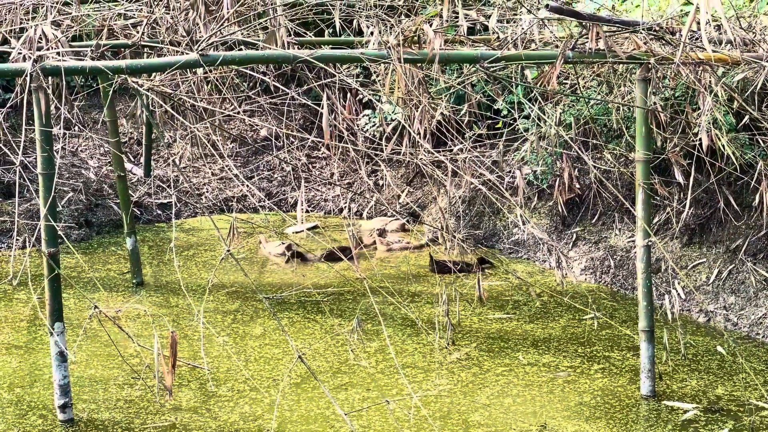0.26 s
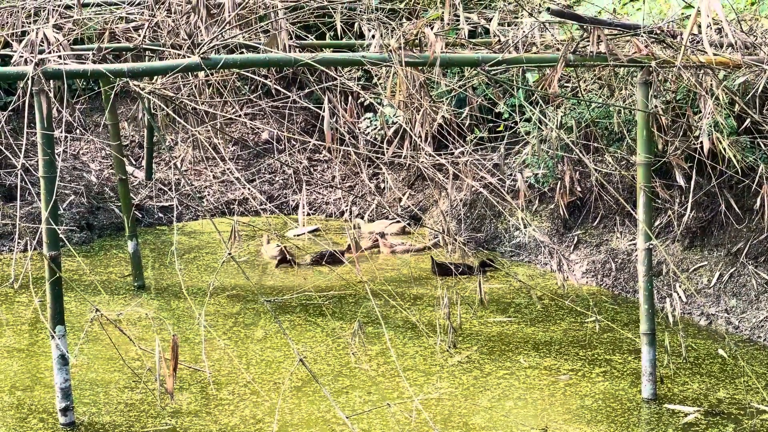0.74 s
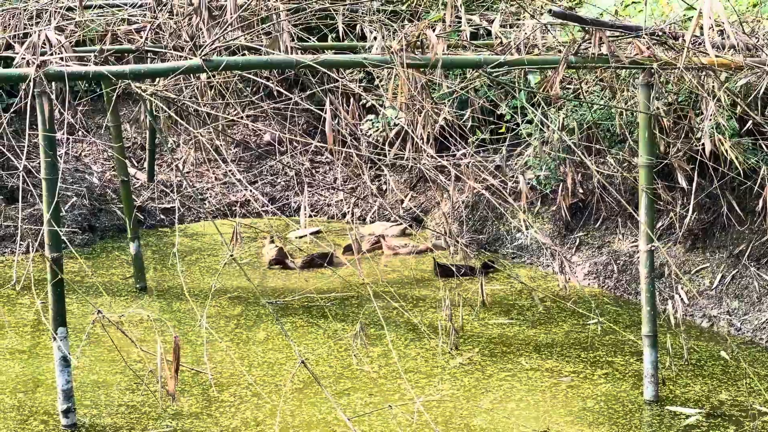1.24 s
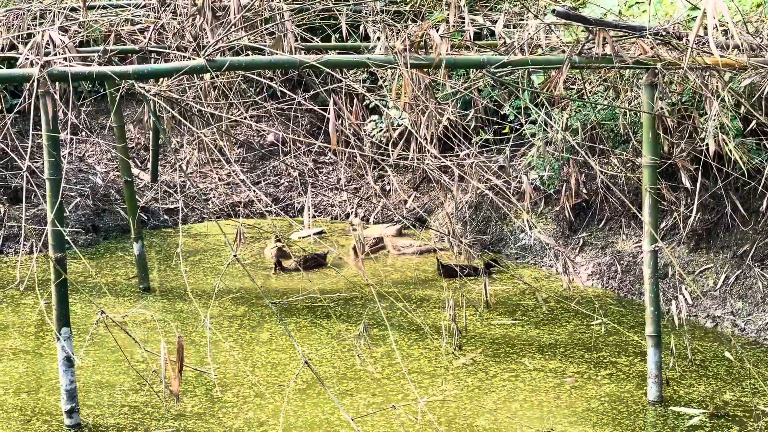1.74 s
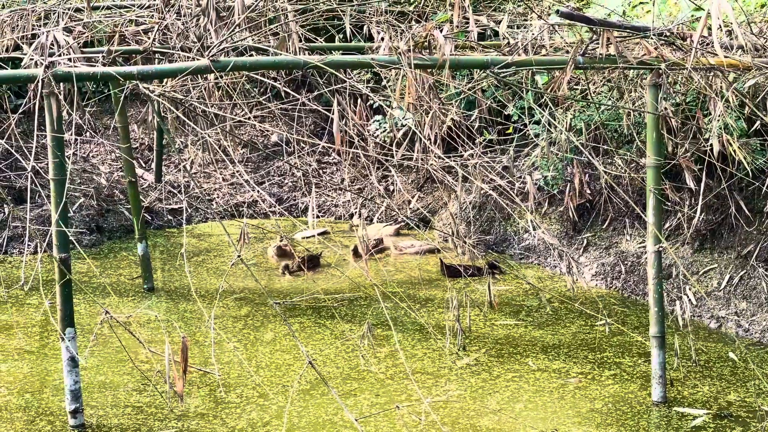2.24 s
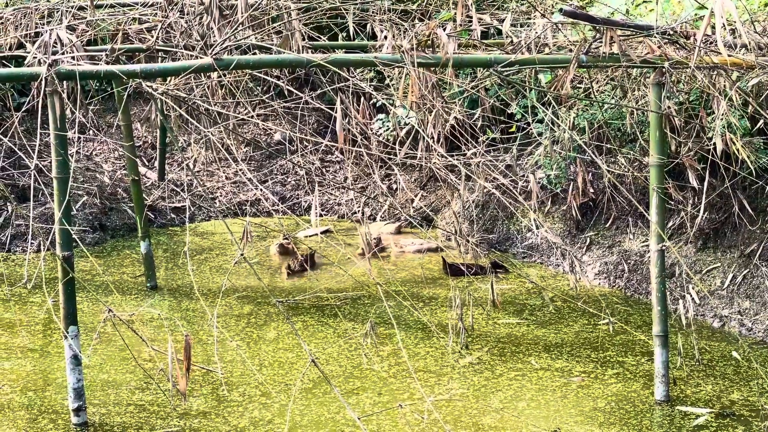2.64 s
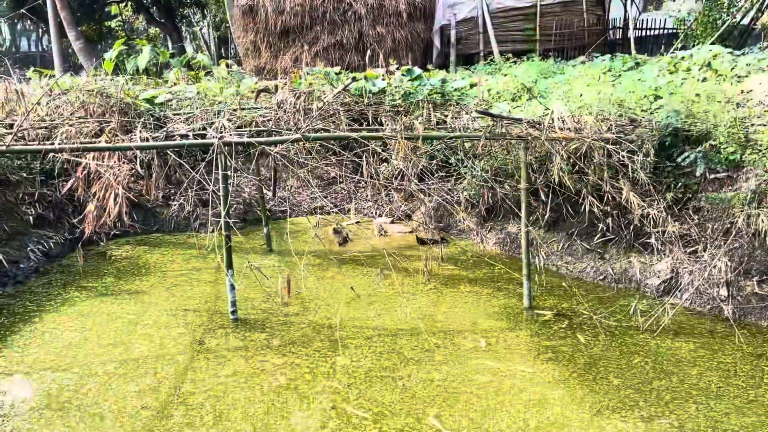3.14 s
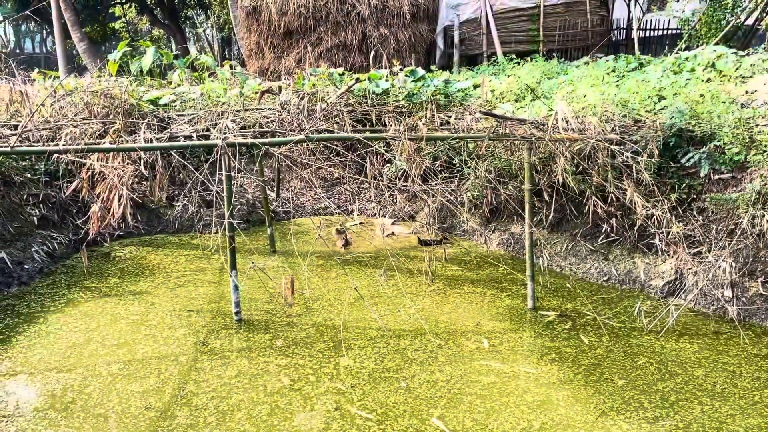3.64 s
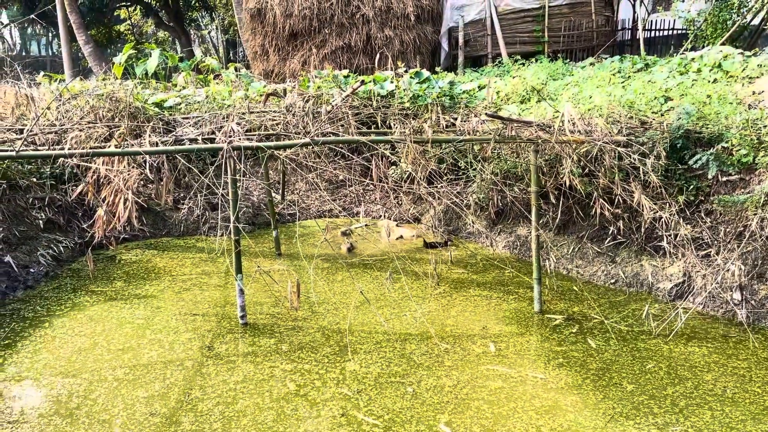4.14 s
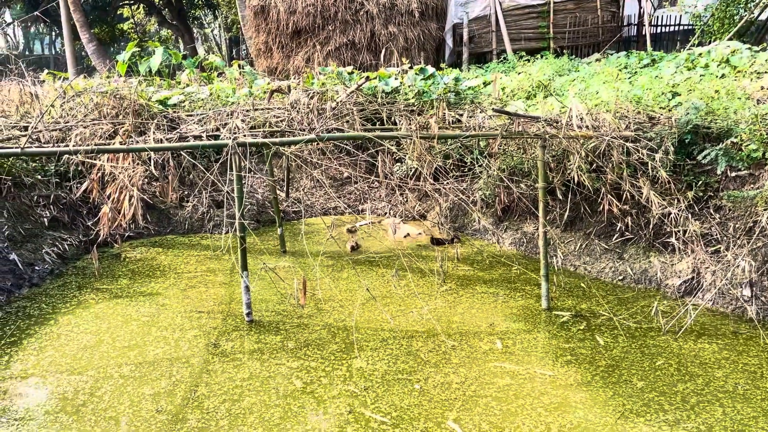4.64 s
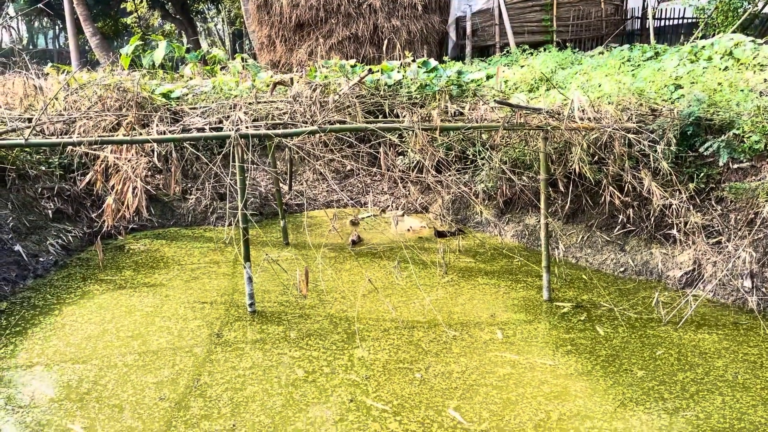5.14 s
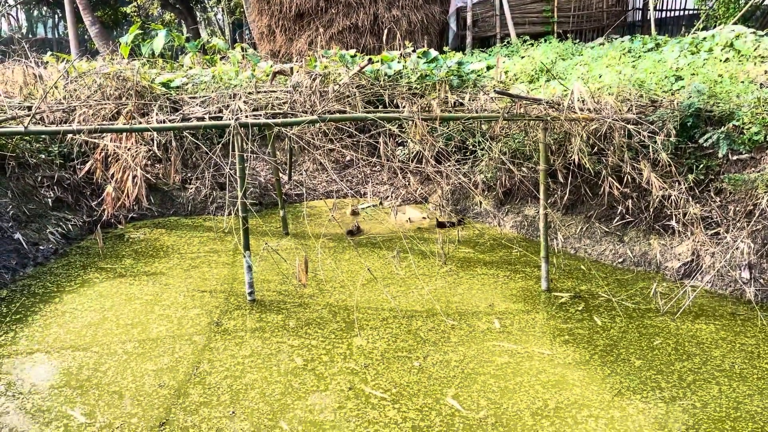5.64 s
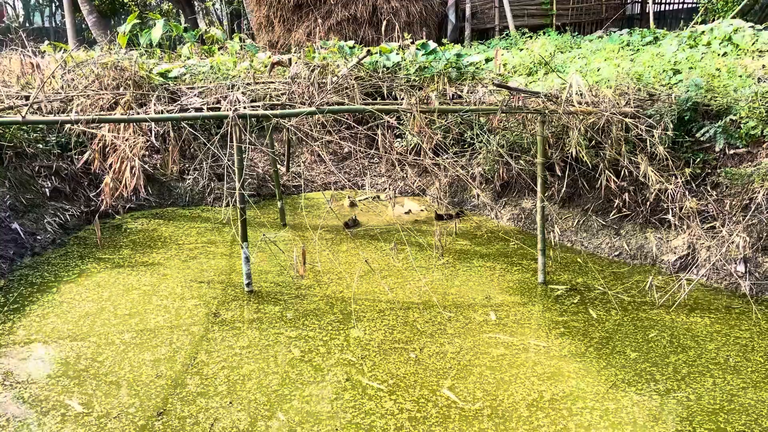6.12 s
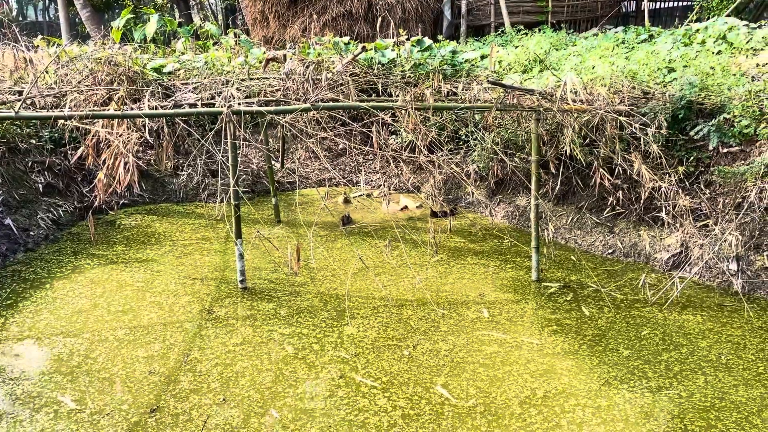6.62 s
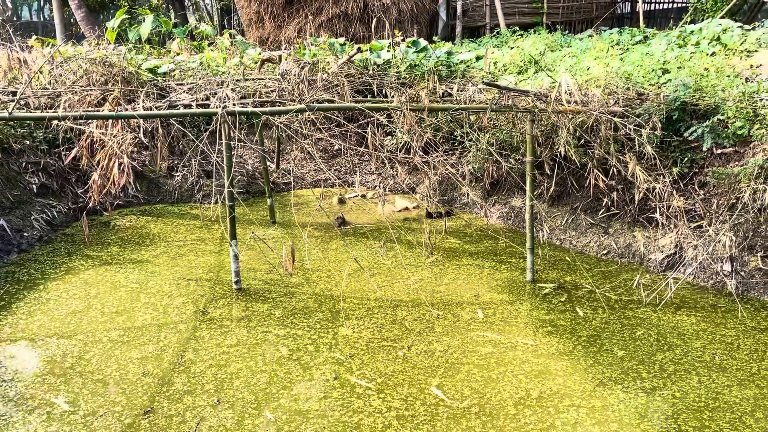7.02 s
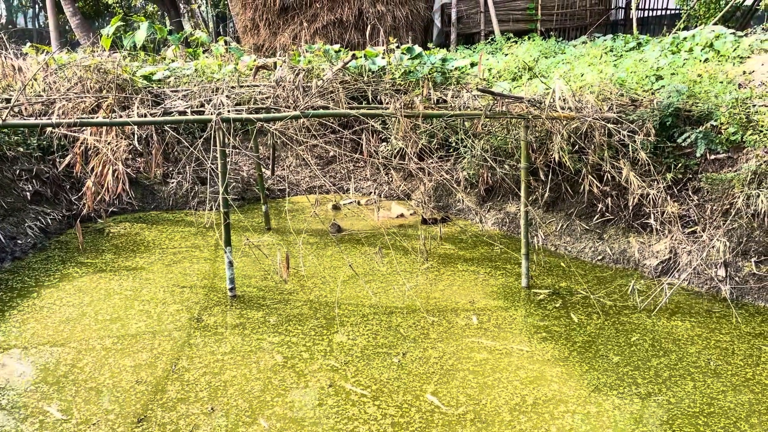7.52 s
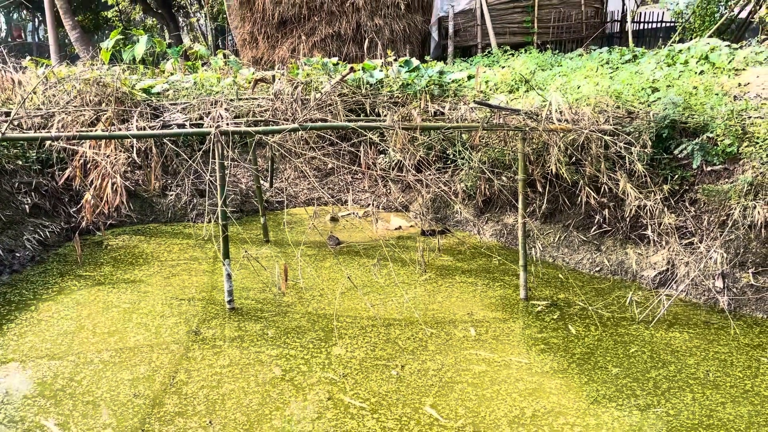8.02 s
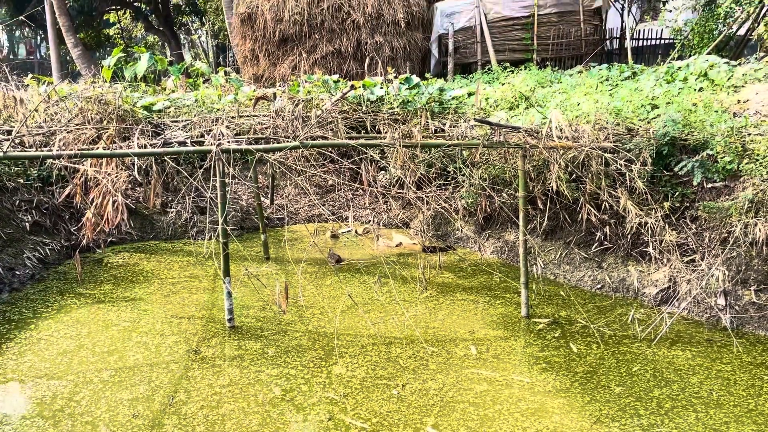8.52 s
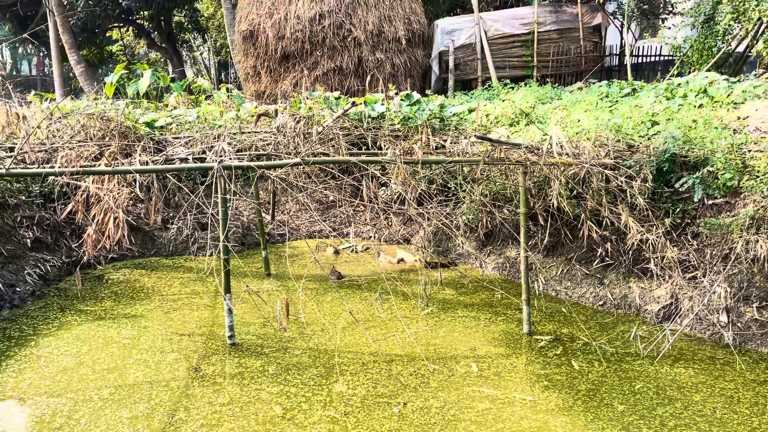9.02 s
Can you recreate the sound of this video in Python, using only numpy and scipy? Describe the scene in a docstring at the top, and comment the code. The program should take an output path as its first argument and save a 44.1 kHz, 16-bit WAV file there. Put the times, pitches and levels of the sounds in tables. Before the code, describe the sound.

Constant low engine putter from beyond the bank lies under a soft bed of leaves and water. Ducks sift the weed with light, irregular pops, clicks and splashes. A few birds whistle faintly in the first four seconds, and tiny hoarse croaks come in three brief groups before five seconds. Later only feeding, faint gurgles and close dry ticks remain, the sharpest at about six seconds. The steep banks return a faint, short echo to a handheld stereo microphone.

```python
"""On a weed-covered farm pond a few ducks dabble and croak, some metres from a handheld two-port microphone.
Croaks are pulse trains through two throat resonances; smacks are ringing bubbles with bill clatter and splash.
Dry ticks crack close by; short broken sines gurgle. Beyond the bank a single-cylinder pump engine thuds:
each firing puffs through pipe and silencer. Small birds whistle gliding near-sines in the bushes.
The banks send back dying-noise echoes, over a bed of rumble, leaves and water in bands of stereo noise."""
import sys
import numpy as np
from scipy import signal
from scipy.fft import rfft, irfft, next_fast_len
from scipy.io import wavfile

SR = 44100
rng = np.random.default_rng(int(sys.argv[2]) if len(sys.argv) > 2 else 0)


def file_out(sig):
    """Save sig as 16-bit WAV at sys.argv[1]."""
    # one column per channel
    cols = np.atleast_2d(sig).T
    # limit, then scale
    lim = np.clip(cols, -1, 1)
    pcm = np.round(lim * 32767).astype(np.int16)
    wavfile.write(sys.argv[1], SR, pcm)


N = 408807

# croak syllables: start_s, length_s, pulse_rate_per_s, high_from_hz, high_to_hz, high_level_db,
# clear_share (0-1), low_throat_hz, low_level_db; levels before the gains of the two ports
SYLLABLES = [ (2.127, 0.063, 186, 2440, 2380, -62, 0.2, 1570, -60),
             (2.17, 0.043, 120, 2196, 2444, -53, 0.95, 1500, -65),
             (2.202, 0.048, 216, 2870, 2340, -57.5, 0.2, 1570, -56.5),
             (3.84, 0.044, 300, 2177, 2750, -54, 0.64, 1100, -72),
             (3.863, 0.039, 250, 2692, 2042, -49.5, 0.62, 1060, -61),
             (3.895, 0.039, 310, 2003, 1763, -51.5, 0.84, 1130, -75),
             (3.92, 0.02, 280, 1780, 2010, -65, 0.5, 1090, -77),
             (3.947, 0.044, 262, 2610, 2475, -50, 0.36, 1820, -67),
             (4.643, 0.055, 220, 2350, 2460, -63.5, 0, 1630, -59),
             (4.682, 0.032, 240, 2325, 2550, -55.5, 0.7, 1500, -63),
             (4.706, 0.049, 185, 2940, 2740, -60, 0.16, 1740, -54),
             (4.917, 0.08, 195, 2310, 2990, -60.5, 0.35, 1750, -68),
             (4.936, 0.058, 223, 2603, 2206, -44.5, 0.63, 1750, -85),
             (4.989, 0.04, 210, 2170, 2645, -46, 0.48, 1780, -66)]
SYLLABLE_ATTACK_S, SYLLABLE_RELEASE_S = 0.0039, 0.014
GLIDE_SHARE = .75   # the glide is done this far into a syllable
PULSE_ARCH = .04   # the pulses speed up by this share in mid-syllable
THROAT_WIDTH_HZ, HOARSE = 560, .42   # HOARSE scales the flutter of strength and phase (radians)
BILL_HZ, BILL_DB = 3200, -7   # a steady upper ring of the bill, relative to the high throat

# bills, feet and bodies smacking the water: start_s, level_db, pitch_hz
DABBLES = [(0.024, -55, 1660), (0.0958, -56.5, 3480), (0.3384, -55, 2560), (0.3425, -48.5, 2110),
           (0.383, -55, 1130), (0.5, -58.5, 1640), (0.803, -55, 700), (1.017, -54, 1344),
           (1.0408, -52, 1150), (1.105, -58, 2900), (1.1316, -49.5, 1590), (1.284, -64, 2100),
           (1.342, -57.5, 1160), (1.378, -55, 2690), (1.501, -56.5, 3115), (1.5358, -53, 1590),
           (1.5849, -46.5, 1185), (1.804, -51, 1120), (1.8502, -55, 1130), (2.148, -47.5, 1130),
           (2.5398, -51, 1190), (2.596, -54.5, 1140), (2.829, -61, 2440), (2.92, -59.5, 1650),
           (3.439, -54.5, 1070), (3.472, -51.5, 770), (3.482, -53, 1700), (3.897, -46, 1140),
           (4.102, -52, 1050), (5.0824, -49.5, 3600), (5.1488, -51.5, 2860), (5.1909, -46, 1080),
           (5.5268, -61, 2180), (5.5695, -56, 2100), (5.689, -58, 3270), (5.752, -57, 1310),
           (5.8383, -62.5, 1730), (5.949, -50.5, 1180), (5.9734, -51.5, 1150), (6.02, -61, 1730),
           (6.143, -59.5, 3050), (6.22, -62, 2400), (6.292, -56.5, 3750), (6.381, -57, 2310),
           (6.352, -53, 590), (6.404, -50.5, 900), (6.435, -54, 1700), (6.547, -61, 3800),
           (6.5915, -61.5, 3900), (6.6344, -56, 1050), (6.6595, -52, 1500), (6.6844, -53, 1600),
           (6.764, -55, 1150), (6.797, -56, 1940), (6.835, -56, 2230), (6.8698, -56, 2270),
           (6.896, -52.5, 2270), (6.927, -60, 1850), (6.966, -64, 1240), (6.985, -58, 2340),
           (7.025, -53, 1170), (7.0485, -54.5, 3800), (7.2262, -58, 3260), (7.311, -52, 1240),
           (7.3508, -58, 1700), (7.382, -56, 2820), (7.43, -57, 1200), (7.5018, -58, 1720),
           (7.5587, -61.5, 4000), (7.6362, -56, 1600), (7.76, -65, 3600), (7.8268, -54, 3820),
           (7.9578, -55.5, 2340), (7.971, -54.5, 1670), (7.99, -54.5, 1590), (8.0648, -57.5, 3450),
           (8.1468, -60, 3400), (8.3737, -54.5, 3940), (8.53, -45, 700), (8.632, -46.5, 1950),
           (8.8186, -56, 2060), (8.9226, -58.5, 2370), (9.059, -56, 2140), (9.137, -57.5, 2260),
           (9.184, -58.5, 3720)]
BUBBLE_T60_S, FULL_SPLASH_HZ = 0.021, 2000   # smacks pitched lower splash less
SNAP = .2   # gain of the sharp click at the front of a fully wet smack
# rings of a bill sifting the weed: pitch_hz
CLATTER_HZ = [1150, 1720, 2350, 2850, 3550, 4150]
CLATTER_DB = -3   # each ring beside the bubble, in a fully wet smack
# the flock feeding: time_s, small_smacks_per_s (before flurries), air_lift_db (hiss above 450 Hz)
FEEDING = [(0, 61, 4), (1.7, 53, 5.5), (2.0, 16, 3.5), (2.8, 7.9, 3), (3.8, 29, 4), (3.92, 62, 13.5),
           (4.3, 31, 6), (5.0, 60, 8), (5.6, 93, 3.5), (6.9, 130, 6.5), (8.1, 40, 5), (9.27, 35, 4)]
PATTER_DB = -71   # the smallest of the faint smacks

# dry ticks close by: start_s, peak_db, upper_ring_share (0-1)
TICKS = [(0.2103, -42, 0.47), (0.3372, -45, 0.3), (1.042, -48, 0.27), (1.3686, -42.5, 0.15),
         (1.505, -45.5, 0.26), (2.5583, -40, 0.7), (3.8791, -52, .9), (4.0103, -45, 0.25),
         (4.6359, -54, 0.1), (4.7152, -50, 0.22), (4.8551, -43.5, 0.07), (5.2783, -48, 0.4),
         (5.7523, -49, 0.2), (6.0761, -31.5, 1), (6.093, -47, 0.6), (6.1937, -54, 0.9), (6.293, -40, 0.2),
         (7.2564, -53, 1), (7.3109, -46, 0.4), (7.5716, -48, 0.9), (7.6387, -40.5, 0.94),
         (8.674, -48.5, .97), (9.1272, -51, .95), (9.2393, -48, 0.88)]
# treble rings that colour each tick: pitch_hz, width_hz (of each of two passes)
TICK_RINGS = [(6800, 1480), (11700, 4100)]
FAINT_TICKS_PER_S, FAINT_TICK_DB = 3, -64   # the level of the faintest

# rising gurgles: start_s, length_s, from_hz, to_hz, level_db (before the wobble), alike_share (0-1, both ports)
GURGLES = [(2.929, 0.031, 1706, 1720, -63, 0.9), (2.944, 0.038, 2340, 2450, -70, 0.97),
           (6.979, 0.065, 940, 1870, -69, 0.15), (7.176, 0.11, 1210, 1950, -68.5, 0.27)]

# engine speed: time_s, firings_per_s
ENGINE = [(0.0, 14.565), (1.03, 14.675), (2.06, 14.616), (3.09, 14.62), (4.12, 14.678), (5.15, 14.679),
          (6.18, 14.696), (7.21, 14.622), (8.24, 14.591), (9.27, 14.506)]
# pipe and silencer: pitch_hz, width_hz (of each of two passes)
EXHAUST = [(87, 52), (80, 200)]
# ways from the engine to the microphone: delay_s, left_gain, right_gain
PATHS = [(0, 1.0, .665), (.010, -.446, -.356), (.0272, -.538, -.396), (.0369, .229, .161)]
FIRST_FIRING_S = .006   # before the waver
ENGINE_DB = -46.5   # rms before the paths
FIRING_SPREAD_DB, FIRING_WAVER = 1.1, .003   # waver as a share of the gap between firings
TRAP_HZ, TRAP_WIDTH_HZ = 242, 45   # a narrow band around this pitch is swallowed

# bird whistles: start_s, length_s, from_hz, to_hz, arch_hz, loudest_at (0-1 of the length),
# level_db (rms at the loudest, before flutter), hoarseness, echo_db (send to the banks beside the direct sound)
WHISTLES = [(.732, .155, 2350, 4850, 0, .85, -63, .01, 8), (1.44, .14, 3650, 4400, 0, .4, -72, .7, 8),
            (1.685, .12, 3050, 2950, -60, .4, -69, .7, 7), (1.806, .036, 4400, 4690, 120, .5, -61, .03, 6),
            (3.31, .17, 4450, 4500, 0, .45, -72, 1.5, 11), (3.51, .13, 3930, 3930, 0, .8, -73, .02, -3)]
WHISTLE_SWELL_DB = 10   # how much softer the ends are; more when hoarseness passes 1
WHISTLE_BEND = .82   # glides start fast and slow down
BANK_T60_S, BANK_DB, BANK_DELAY_S = .55, -10.5, .02   # the fade before the treble is soaked up

# bed of air, leaves and water: pitch_hz, density_db_per_hz (before the lift of FEEDING and the wavering)
AIR = [(36, -106), (54, -74.5), (100, -79), (160, -80), (240, -92.5), (330, -93.5), (450, -103),
       (750, -112), (1300, -111), (2500, -110), (4500, -115), (6500, -117), (9200, -121), (11800, -118),
       (13300, -127), (15000, -150)]
# left-right likeness of the bed: pitch_hz, likeness
LIKENESS = [(60, 0.77), (300, 0.33), (700, 0.18), (1500, 0.072), (2800, 1), (5600, 0.11), (8500, 0.9),
            (12000, 1)]
PATCHY_DB = 2.3   # spread of the wavering of each band

# phase between the ports: pitch_hz, left_lead_rad
PORT_LEAD = [(60, -.25), (260, -.6), (1000, 0), (4000, .8), (5200, .9), (5900, -1.2), (8500, -3.1),
             (12000, -5.2), (15000, -6.3)]
CUTOFF_HZ = 15900   # 70 dB down from here up


def amp(db):
    """Gain of a level in dB."""
    return 10 ** (np.asarray(db) / 20)


def rms_one(x):
    """Scale to rms 1."""
    return x / np.sqrt(np.mean(x ** 2) + 1e-20)


def columns(rows, t):
    """The columns of a curve table read at times t."""
    s, *rest = np.transpose(rows)
    return [np.interp(t, s, c) for c in rest]


def at_hz(points, hz):
    """A spectrum table read on a log-frequency axis."""
    table_hz, value = np.array(points).T
    return np.interp(np.log(hz), np.log(table_hz), value)


def drift(rate):
    """Slow chance with spread 1: noise at a 40th of SR through two equal low-pass poles at rate Hz."""
    r = np.exp(-80 * np.pi * rate / SR)
    slow = signal.lfilter([1], [1, -2 * r, r * r], rng.standard_normal(N // 40 + 2002))[2000:]
    return np.interp(np.arange(N) / 40, np.arange(len(slow)), rms_one(slow))


def resonance(x, hz, width_hz):
    """Two-pole band-pass with gain 1 on top."""
    r = np.exp(-np.pi * width_hz / SR)
    top = np.array([1, 0, -1]) * (1 - r * r) / 2
    return signal.lfilter(top, [1, -2 * r * np.cos(2 * np.pi * hz / SR), r * r], x + 1e-18)


def resonance_twice(x, hz, width_hz):
    """The same band-pass passed twice, for steeper sides."""
    return resonance(resonance(x, hz, width_hz), hz, width_hz)


def add(out, s, sound):
    """Mix a short sound in at time s."""
    i = int(s * SR)
    out[..., i:i + sound.shape[-1]] += sound[..., :N - i]


def throat(turns, rate, hz, rasp):
    """The pulse train's harmonics inside a moving throat resonance, each fluttering on its own; rms about 1."""
    k = np.arange(3, 19)[:, None]   # harmonic numbers
    weight = 1 / (1 + (2 * (k * rate - hz) / THROAT_WIDTH_HZ) ** 2) ** 1.3
    voiced = (1 + HOARSE * rasp) * np.cos(2 * np.pi * k * turns + HOARSE * rasp[::-1])
    return np.sqrt(2) * (weight * voiced).sum(0) / np.sqrt((weight ** 2).sum(0))


def croaks():
    """Uneven pulses ring a low throat and a gliding high one that at times whistles clear."""
    low, high, waver, flutter = np.zeros(N), np.zeros(N), drift(25), drift(90)
    for s, length, rate, from_hz, to_hz, high_db, clear, low_hz, low_db in SYLLABLES:
        t = np.arange(0, length, 1 / SR)
        i = int(s * SR) + np.arange(len(t))
        # one stretch of flutter for each harmonic
        rasp = flutter[(i + 9000 * np.arange(16)[:, None]) % N]
        pulse_rate = rate * (1 + PULSE_ARCH * np.sin(np.pi * t / length) + .015 * waver[i])
        turns = np.cumsum(pulse_rate) / SR
        edge = np.clip(np.minimum(t / SYLLABLE_ATTACK_S, (length - t) / SYLLABLE_RELEASE_S), 0, 1)
        glide = np.sin(np.pi * np.minimum(t / length / GLIDE_SHARE, 1) / 2)
        hz = from_hz + (to_hz - from_hz) * glide
        clear = np.clip(clear, 0, 1)
        bill = amp(BILL_DB) * (1 - clear) * throat(turns, rate, BILL_HZ, rasp)
        buzz = throat(turns, rate, hz, rasp) + bill
        tone_phase = 2 * np.pi * np.cumsum(hz) / SR + HOARSE * rasp[1]
        tone = np.sqrt(2) * amp(2 * rasp[0]) * np.sin(tone_phase)
        add(low, s, edge * amp(low_db) * throat(turns, rate, low_hz, rasp))
        add(high, s, edge * amp(high_db) * (np.sqrt(1 - clear) * buzz + np.sqrt(clear) * tone))
    # the low throat reaches the ports in opposite phase; both are stronger on the left
    return low * [[2.0], [-.45]] + high * amp([[1], [-1]])


def smack(hz, noise, wet):
    """A trapped bubble rings briefly, rising in pitch, with the clatter of the bill and a short splash."""
    t = np.arange(len(noise)) / SR
    fade = (1 - np.exp(-t / 0.0004)) * amp(-60 * t / BUBBLE_T60_S)
    clatter = noise[:len(CLATTER_HZ)] @ np.sin(2 * np.pi * np.outer(CLATTER_HZ, t))
    bubble = np.sin(2 * np.pi * hz * t * (1 + 0.4 * t))
    ring = fade * (bubble + wet * amp(CLATTER_DB) * clatter)
    splash = rms_one(resonance_twice(noise, 1.1 * hz, hz / 2)) * amp(-60 * t / 0.045)
    snap = SNAP * np.diff(noise, prepend=0) * amp(-60 * t / 0.0008)
    return ring + np.sqrt(wet) * splash + wet * snap


def dabbles():
    """The clear smacks of bills, feet and bodies on the water, one by one."""
    out = np.zeros(N)
    for (s, level_db, hz), noise in zip(DABBLES, rng.standard_normal((len(DABBLES), 2000))):
        wet = min(hz / FULL_SPLASH_HZ, 1) ** 2
        add(out, s, smack(hz, noise, wet) * amp(level_db))
    return out


def patter(per_s):
    """Many fainter smacks at random, in flurries, each bubble pitched near one ring of the bill."""
    out = np.zeros(N)
    born = np.flatnonzero(rng.random(N) < per_s * amp(7 * drift(4)) / SR)
    size, ring_hz = rng.exponential(1, N), rng.choice(CLATTER_HZ, N)
    noise = rng.standard_normal(N + 900)
    for i in born:
        hz = ring_hz[i] * (1 + .04 * noise[i])
        level_db = PATTER_DB + 3.5 * min(size[i], 2.5)
        add(out, i / SR, smack(hz, noise[i:i + 900], wet=.3) * amp(level_db))
    return out


def ticks():
    """A sharp click with a short spray of noise, through two broad treble rings; fainter ones come at random."""
    out, t = np.zeros(N), np.arange(3000) / SR
    when, size, share = rng.random((3, N))
    born = np.flatnonzero(when < FAINT_TICKS_PER_S / SR)
    faint = [(i / SR, FAINT_TICK_DB + 5 * size[i], share[i]) for i in born]
    noise = rng.standard_normal(N + len(t))
    spray_fade = amp(-60 * t / .008) + .05 * amp(-60 * t / .12)
    for s, peak_db, upper in list(TICKS) + faint:
        crack = 4 * (t == 0) + noise[int(s * SR):][:len(t)] * spray_fade
        upper = np.clip(upper, 0, .97)   # some of the lower ring always stays
        low_ring, high_ring = [resonance_twice(crack, *ring) for ring in TICK_RINGS]
        tick = np.sqrt(1 - upper ** 2) * low_ring + upper * high_ring
        add(out, s, amp(peak_db) * tick / np.abs(tick).max())
    return out


def gurgles():
    """A bubble climbing to the surface: a short, broken sine that rises and levels off."""
    out, wobble = np.zeros((2, N)), drift(126)
    for s, length, from_hz, to_hz, level_db, alike in GURGLES:
        u = np.arange(0, 1, 1 / (length * SR))
        hz = from_hz + (to_hz - from_hz) * np.sin(np.pi * u / 2)
        strength = amp(level_db + 9.1 * wobble[int(s * SR):][:len(u)]) * np.sin(np.pi * u)
        tone = strength * np.sin(2 * np.pi * np.cumsum(hz) / SR)
        add(out, s, np.sqrt(2) * tone * [[1], [2 * alike - 1]])   # left, right
    return out


def engine():
    """One puff per firing swells through pipe and silencer and arrives by several paths."""
    lead = SR // 4   # samples: already running at the start
    t = np.arange(-lead, N) / SR
    turns = np.cumsum(columns(ENGINE, t)[0]) / SR   # one turn per firing
    waver = FIRING_WAVER * np.resize(drift(4), len(t))
    turns = np.floor(turns - np.interp(FIRST_FIRING_S, t, turns) + waver)
    # the running maximum keeps the waver from firing twice
    fired = np.diff(np.maximum.accumulate(turns), prepend=turns[0])
    x = -fired * amp(FIRING_SPREAD_DB * rng.standard_normal(len(t)))
    for hz, width_hz in EXHAUST:
        x = resonance_twice(x, hz, width_hz)
    x = amp(ENGINE_DB) * rms_one(x - resonance(x, TRAP_HZ, TRAP_WIDTH_HZ))
    return sum(np.outer(gains, np.interp(t - lag, t, x)[lead:]) for lag, *gains in PATHS)


def whistles():
    """Gliding near-sines swell and fade, wavering in pitch and strength; row 2 is their send to the banks."""
    out, waver, flutter = np.zeros((2, N)), drift(300), drift(60)
    for s, length, from_hz, to_hz, arch_hz, top, level_db, hoarse, echo_db in WHISTLES:
        u = np.arange(0, 1, 1 / (length * SR))
        i = int(s * SR) + np.arange(len(u))
        from_top = np.where(u < top, 1 - u / top, (u - top) / (1 - top))
        swell_db = -WHISTLE_SWELL_DB * max(hoarse, 1) * from_top ** 2
        flutter_db = 2.5 * min(hoarse, 1) * flutter[i]
        hz = from_hz + (to_hz - from_hz) * u ** WHISTLE_BEND + arch_hz * np.sin(np.pi * u)
        turns = np.cumsum(hz * (1 + .04 * hoarse * waver[i])) / SR
        tone = amp(level_db + swell_db + flutter_db) * np.sin(2 * np.pi * turns)
        add(out, s, np.sqrt(2) * tone * amp([[0], [echo_db]]))
    return out


def banks(x):
    """Scattered echoes from the steep banks and bushes: dying noise, its own on each side."""
    t = np.arange(SR // 2) / SR
    tail = rng.standard_normal((2, len(t))) * amp(-60 * t / BANK_T60_S) * (t > BANK_DELAY_S)
    tail = signal.lfilter([.4], [1, -.6], tail)   # leaves soak up the treble
    tail /= np.sqrt((tail ** 2).sum(1, keepdims=True))
    return amp(BANK_DB) * signal.fftconvolve(x[None], tail, axes=1)[:, :N]


def air(lift_db):
    """Distant rumble (stronger on the left), leaves and water: bands of stereo noise, each wavering."""
    out, together = 0, drift(6)   # the bands above 450 Hz also waver together, in dB
    edges = 30 * 2 ** np.arange(0, 9.2, 1 / 3)   # third-octaves, Hz
    white = rng.standard_normal((2, 2, N))   # neighbouring bands get unrelated noise
    for k, (low, high) in enumerate(zip(edges, edges[1:])):
        band = signal.butter(2, [low, high], "band", fs=SR, output="sos")
        mid, side = signal.sosfilt(band, white[k % 2])
        hz = np.sqrt(low * high)
        alike = np.clip(at_hz(LIKENESS, hz), -1, 1)
        gain = amp(at_hz(AIR, hz) + (hz > 450) * (lift_db + together) + PATCHY_DB * drift(19.6))
        lean = amp([[1.2], [-1.2]] * np.array(hz < 450))
        stereo = np.sqrt(1 + alike) * mid + np.sqrt(1 - alike) * side * [[1], [-1]]
        out = out + gain * lean * stereo
    return out * np.sqrt(SR / 4)   # from level per Hz to samples


def scene():
    """Everything at the two microphone ports."""
    per_s, lift_db = columns(FEEDING, np.arange(N) / SR)
    voices, water = croaks(), dabbles() + patter(per_s)
    birds, bird_echo = whistles()
    to_banks = amp(2) * voices[1] + bird_echo + amp(-7) * water
    ducks = voices + water + ticks() + gurgles()
    return ducks + engine() + birds + banks(to_banks) + air(lift_db)


def record(dry):
    """The housing shifts the phase between the ports; the top is cut."""
    size = next_fast_len(N + SR // 4)
    hz = np.maximum(np.arange(size // 2 + 1) * SR / size, 1)
    lead = at_hz(PORT_LEAD, hz)
    right = irfft(rfft(dry[1], size) * np.exp(-1j * lead), size)[:N]
    top_cut = signal.cheby2(12, 70, CUTOFF_HZ, fs=SR, output="sos")
    return signal.sosfilt(top_cut, np.array([dry[0], right]))


dry = scene()
out = record(dry)
file_out(out)
```